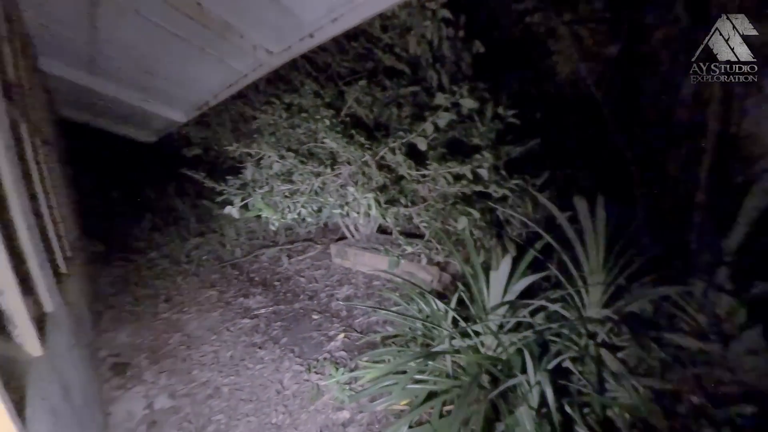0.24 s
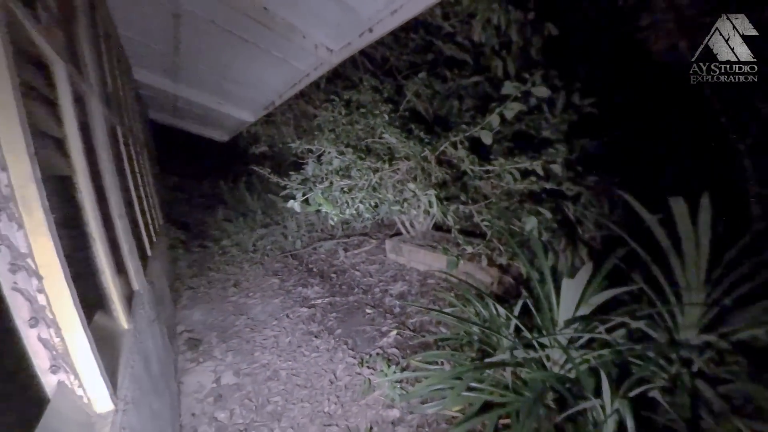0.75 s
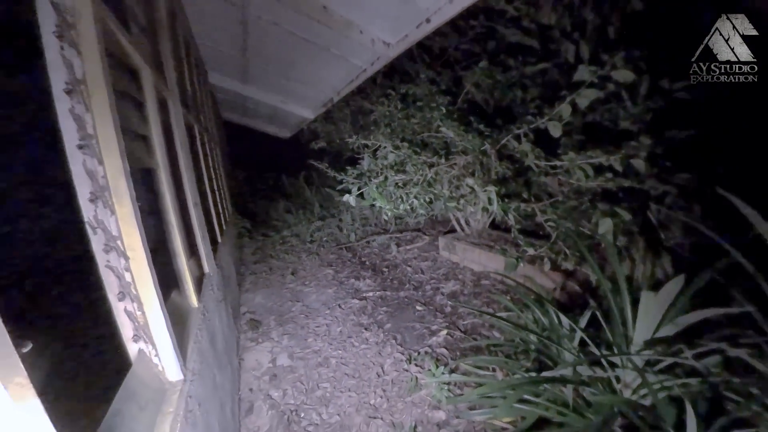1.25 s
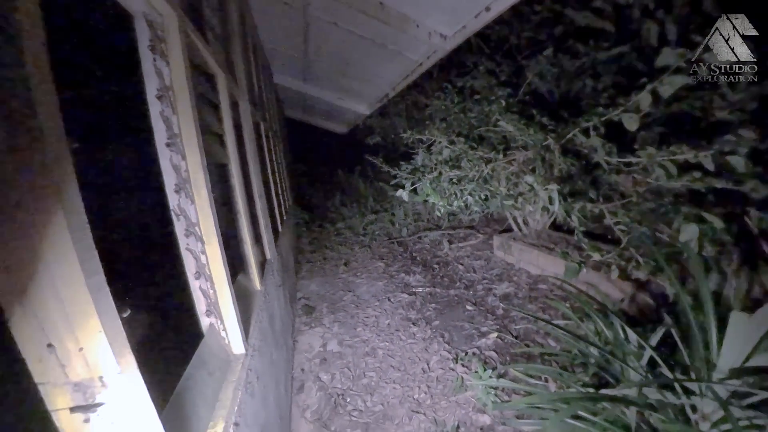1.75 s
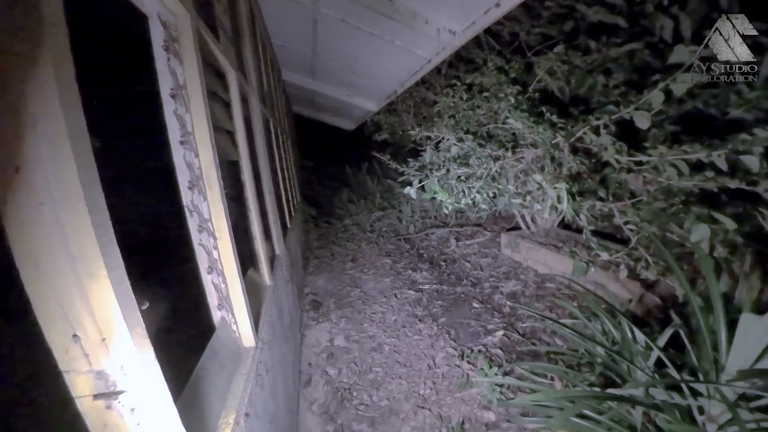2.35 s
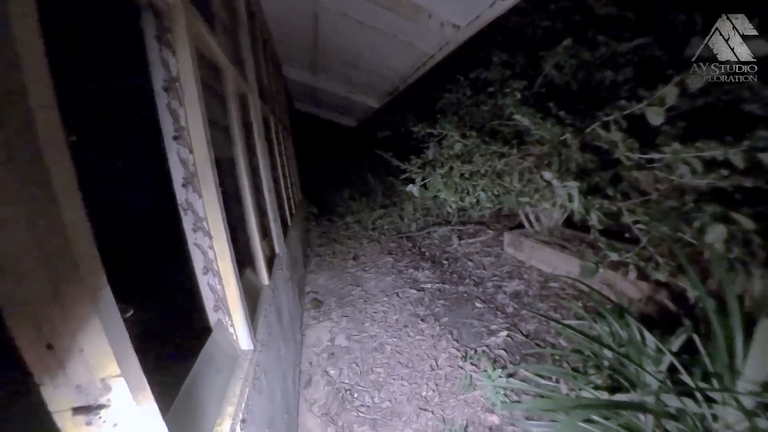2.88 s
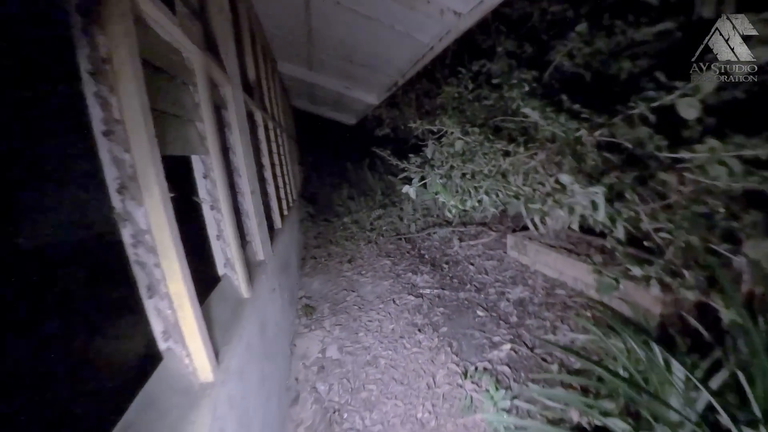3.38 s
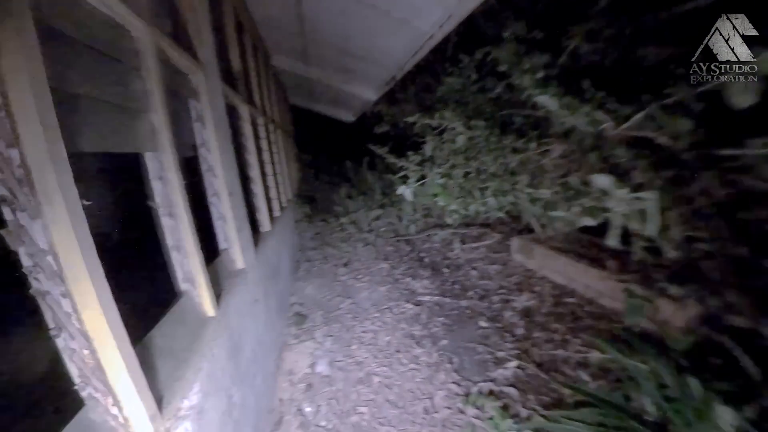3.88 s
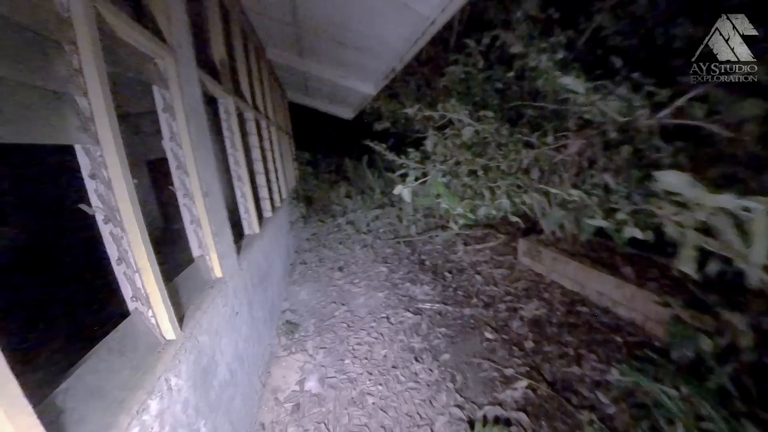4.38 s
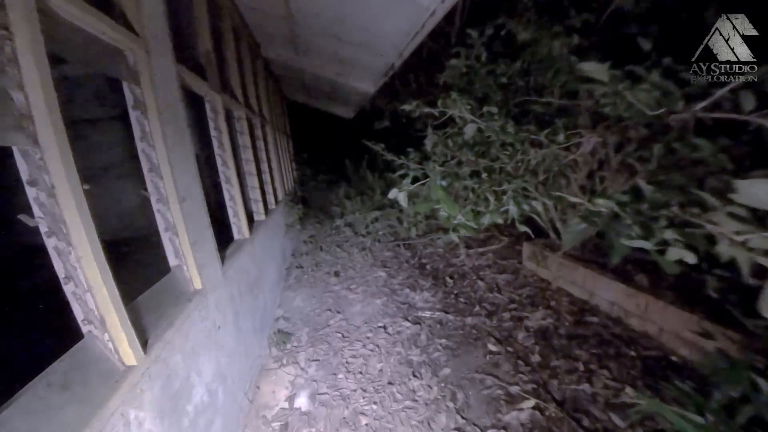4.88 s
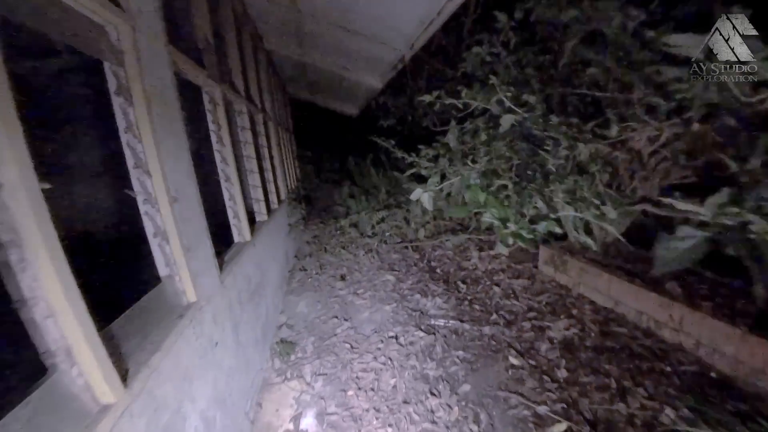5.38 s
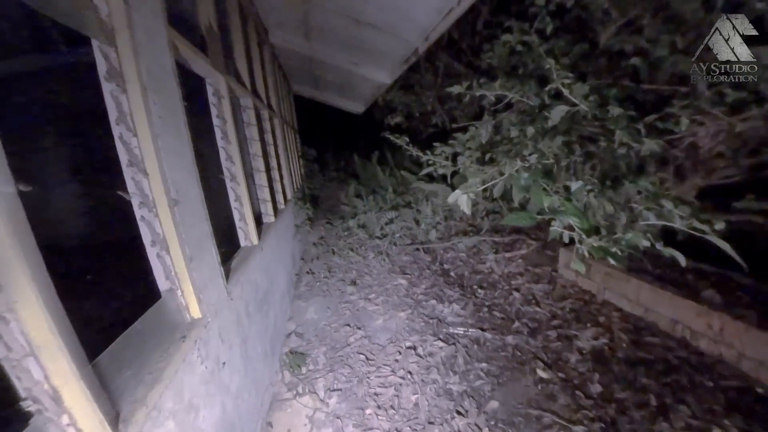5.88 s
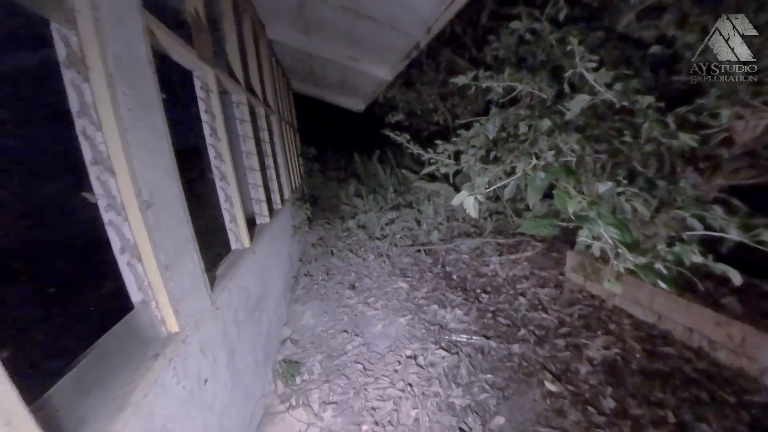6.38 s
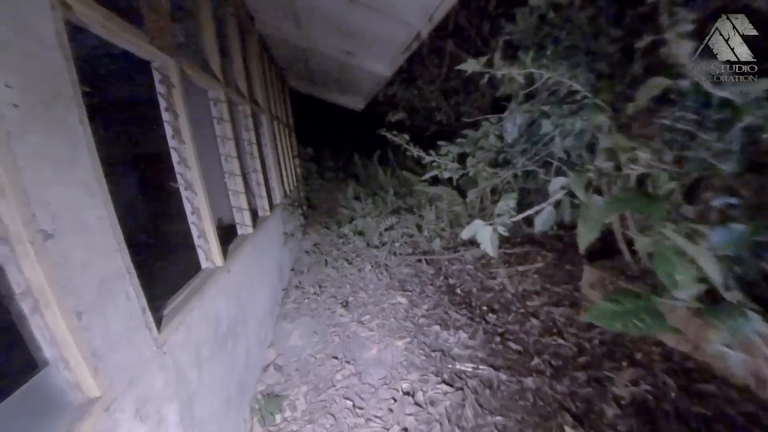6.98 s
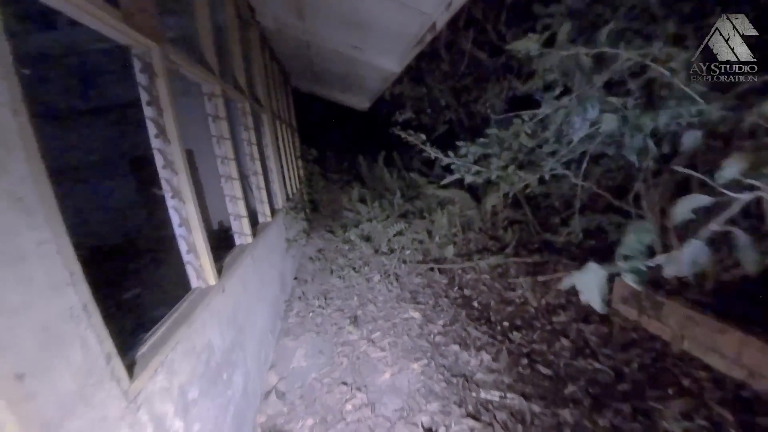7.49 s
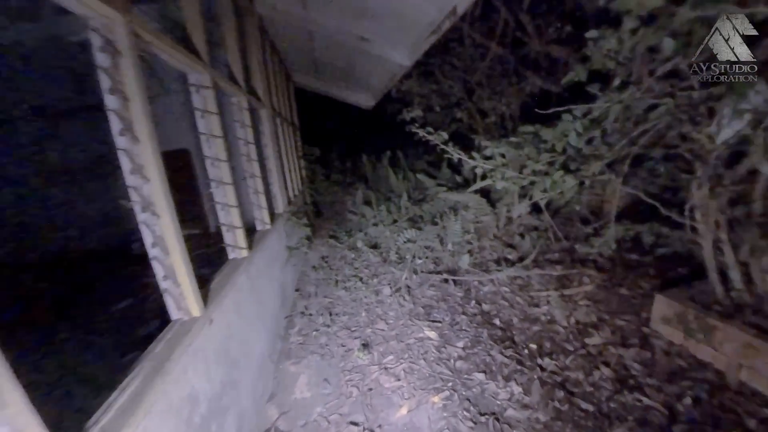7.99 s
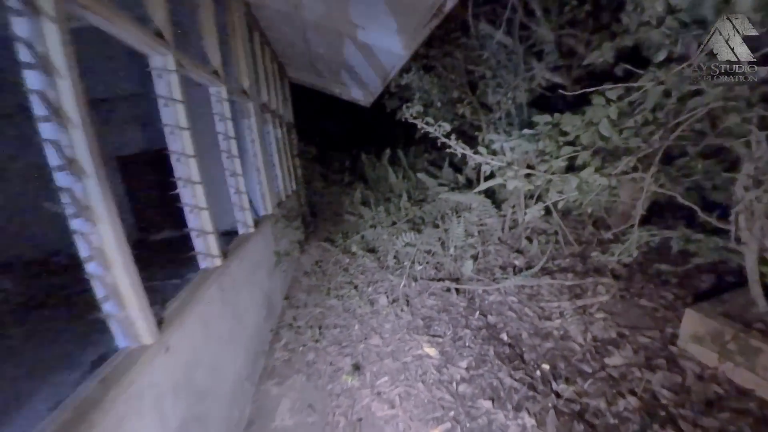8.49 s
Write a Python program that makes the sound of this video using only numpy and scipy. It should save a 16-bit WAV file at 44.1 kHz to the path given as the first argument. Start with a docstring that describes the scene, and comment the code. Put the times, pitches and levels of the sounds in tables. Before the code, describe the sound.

Outdoors at night beside an empty building, someone treads slowly through dry leaves and twigs. The first steps are light, with two crickets chirping nearby over a faint, high insect chorus. Then the steps dig in: twigs snap, leaves crunch, and a sole knocks and scuffs, echoing briefly off the wall. The crickets stop, a big snap lands near the end, and the steps ease. The handheld microphone sounds slightly dull, with low rumble and soft bumps.

```python
"""Night beside an empty building. It opens on an insect chorus, still air and a low rumble, as someone
with a handheld camera treads slowly through dry leaves and twigs. Two crickets chirp nearby and a far
insect trills briefly. From 3.5 s the steps dig in: twigs snap and shed debris, leaves crunch, the sole
knocks and scuffs, heel and hand bump; the wall and the rooms behind its open windows answer. The last
chirp comes at 5.4 s, a big snap lands near 8 s, and the steps ease off under the chorus."""
import sys
import numpy as np
from scipy import signal
from scipy.fft import rfft, irfft, next_fast_len
from scipy.io import wavfile
from scipy.ndimage import uniform_filter1d, map_coordinates

SR = 44100
rng = np.random.default_rng(int(sys.argv[2]) if len(sys.argv) > 2 else 0)


def unload_wav(signal):
    """Save mono or channel-first audio to the path in sys.argv[1] as 16-bit WAV at rate SR, clipped to [-1, 1]."""
    wavfile.write(
        sys.argv[1],
        SR,
        np.round(np.clip(np.atleast_2d(signal).T, -1, 1) * 32767).astype(np.int16),
    )


N = 385654

# Tone of breaking leaves and of breaking twigs: f/Hz, level/dB
LEAF_EQ = [(1200, -40), (2200, -4.5), (3000, -3), (3650, -3), (4200, -3.5), (5200, -2.5), (5800, -6),
           (6400, -4), (9000, -1), (16000, -8)]
TWIG_EQ = [(300, -26), (700, 3.5), (1200, 0.5), (2000, 0), (3500, -4), (8000, -42.5)]
# Snaps, plus two strong slap-backs off the wall (at 1.1575 s and 3.696 s):
# t/s, crack level/dB, twig f/Hz, twig debris level/dB, leaf f/Hz, leaf debris level/dB
SNAPS = [(.065, -23, 880, -30, 5530, -27), (.131, -31, 2130, -37, 3200, -40),
         (.1825, -29.5, 1100, -28, 5130, -39), (.833, -40, 2000, -52, 4000, -45),
         (.992, -36.5, 590, -37.5, 2840, -38), (1.067, -38, 910, -39, 3000, -37),
         (1.1495, -24.5, 990, -32, 2770, -33), (1.1575, -31, 2400, -36, 3820, -32.5),
         (2.185, -61, 870, -41, 4910, -42), (2.289, -46, 710, -37, 4770, -36),
         (2.983, -35, 570, -35.5, 6100, -41), (3.529, -18, 1740, -14.5, 5300, -13),
         (3.5345, -11, 1410, -15, 3600, -10.5), (3.553, -19, 2000, -40, 5940, -15),
         (3.571, -10, 2280, -26, 4740, -13.5), (3.5735, -15, 2800, -27, 7000, -21),
         (3.579, -16, 2230, -32, 3520, -17), (3.598, -6, 2280, -33, 4600, -11),
         (3.625, -15, 2030, -38, 5000, -11), (3.633, -12, 570, -41, 4400, -9),
         (3.643, -19, 2250, -40, 5500, -14.5), (3.688, -14, 696, -43, 4500, -14.5),
         (3.696, -22, 2500, -51, 4770, -25), (3.782, -10, 2050, -40, 4600, -12),
         (3.828, -22.5, 605, -36, 4800, -18), (3.856, -38, 820, -33, 4770, -18),
         (3.9, -36, 1400, -21.5, 2600, -43), (3.9595, -26, 600, -22, 2600, -46),
         (4.044, -29, 960, -21.5, 5700, -21), (4.649, -18, 1800, -44, 3600, -21.5),
         (4.751, -31, 2290, -33, 3900, -19), (4.772, -11, 2100, -18, 5700, -5),
         (4.822, -17, 1530, -20.5, 3840, -15.5), (4.941, -41, 2010, -25, 3170, -26),
         (4.953, -27.5, 664, -24, 5600, -16), (5.064, -28, 1480, -22, 2300, -43),
         (5.0858, 1.5, 1410, -4, 3750, -12.5), (5.271, -12, 1570, -49, 5200, -29),
         (5.477, -21.5, 660, -31.5, 7800, -17), (5.558, -24, 1270, -37, 3950, -21),
         (5.62, -25, 2600, -31, 3650, -19), (5.63, -40, 2260, -24.5, 3900, -15),
         (5.639, -34, 2260, -22, 4500, -7.5), (5.65, -18, 2180, -30, 4950, -2.5),
         (5.677, -15, 2500, -22, 6750, -16), (5.72, -28.5, 1680, -19, 5200, -5.5),
         (5.734, -12, 1060, -13, 2600, -8), (5.766, -22, 1090, -41, 3020, -11.5),
         (5.7897, -4.5, 1440, -13.5, 4640, -5.5), (5.7905, -8.5, 710, -15.5, 2920, -2),
         (5.8395, -13.5, 2520, -29, 3170, -6.5), (5.849, -9, 2300, -37, 5460, -6.5),
         (5.941, -24, 1280, -30, 3840, -36), (5.9612, -11, 2000, -14.5, 4660, -6.5),
         (5.9637, -16, 1500, -21, 6240, -17), (5.9833, -2.5, 990, -13, 4700, -13),
         (6.048, -20, 830, -34, 2700, -20.5), (6.095, -23, 1640, -35, 3900, -34),
         (6.112, -15, 1780, -32.5, 5650, -23.5), (6.431, -26, 980, -23, 2350, -20),
         (6.562, -40, 840, -18, 6000, -43), (6.849, -33, 900, -17.5, 5500, -16.5),
         (6.883, -23, 1410, -35, 4620, -29), (6.928, -24, 840, -29, 2900, -23),
         (6.955, -26, 1310, -20.5, 4000, -21.5), (6.999, -16, 750, -23, 2720, -24),
         (7.035, -25, 2000, -23.5, 5150, -19), (7.092, -18, 1530, -14.5, 4800, -13.5),
         (7.155, -24, 1560, -23, 6070, -33), (7.164, -20, 1510, -21, 4900, -25),
         (7.179, -27, 1500, -33, 4060, -32), (7.218, -21, 1300, -22, 2430, -32),
         (7.281, -33, 1510, -47, 7600, -23), (7.729, -40, 925, -26, 2830, -23),
         (7.944, -23, 2800, -33, 3160, -5.5), (7.9712, 3.5, 2800, -12.5, 4800, 2),
         (8.031, -21, 970, -21, 3000, -11), (8.0475, -12, 1700, -23, 3460, -24),
         (8.061, -16.5, 1520, -23, 3530, -13), (8.105, -21, 1500, -40, 8000, -16),
         (8.149, -17, 1780, -31, 5600, -12)]
def snaps(track_count=4, burst_t60_s=.014, crumble_t60_s=.053, cycles_to_peak=.84):
    """Twig and leaf crack together for a few cycles, then shed debris; snaps take turns across tracks."""
    out, t = np.zeros((track_count, N + SR)), np.arange(SR // 7) / SR
    wood = coloured(unit(breaks(per_s=500, spread_db=2.5)) + .43 * rng.standard_normal(N), TWIG_EQ)
    leaf = coloured(unit(breaks(per_s=2500, spread_db=2.5)) + .61 * rng.standard_normal(N), LEAF_EQ)
    burst = amp(-1.5 - 60 * t / burst_t60_s)
    crumble = amp(-10.5 - 60 * t / crumble_t60_s)
    settle = (burst + crumble) * (1 - np.exp(-t / .0008))
    for k, (s, db, twig_hz, twig_db, leaf_hz, leaf_db) in enumerate(SNAPS):
        fresh = rng.integers(N - len(t)) + np.arange(len(t))
        hit = amp(twig_db) * debris(wood[fresh], twig_hz, q=3.9, settle=settle)
        hit += amp(leaf_db) * debris(leaf[fresh], leaf_hz, q=14, settle=settle)
        twig_share = np.clip(amp(twig_db) / (amp(twig_db) + amp(leaf_db - 6)), .08, .92)
        for hz, share in [(twig_hz, twig_share), (leaf_hz, 1 - twig_share)]:
            crack = hump(t * hz / cycles_to_peak) * np.sin(2 * np.pi * hz * t)
            hit += amp(db) * np.sqrt(2 * share) * crack
        out[k % track_count, round(s * SR):][:len(t)] += hit
    return out[:, :N]


def debris(crumbs, hz, q, settle):
    """Crumbs ring at the pitch of the broken piece and of a neighbour as they settle."""
    neighbour_hz = hz * rng.uniform(.75, 1.35)
    rings = .56 * crumbs + ring(crumbs, hz, q) + .26 * ring(crumbs, neighbour_hz, q)
    return unit(settle * rings) * np.sqrt(np.mean(settle ** 2))


# Leaf accents: t/s, level/dB, f/Hz, attack/s
FLICKS = [(3.535, -21, 5700, 0.0022), (3.541, -24, 3450, 0.0027), (3.552, -20.5, 6050, 0.0023),
          (3.633, -23, 4530, 0.0024), (3.643, -20, 5960, 0.0016), (4.825, -34, 3880, 0.011),
          (4.84, -35.5, 5500, .012), (5.086, -22, 5300, 0.0032), (5.095, -16, 1700, .008),
          (5.1, -17, 5300, 0.0035), (5.633, -26, 2240, 0.0033), (5.638, -21, 3700, 0.0036),
          (5.642, -20, 5900, 0.0032), (5.647, -12.5, 4820, 0.0042), (5.659, -14, 5080, 0.0034),
          (5.6992, -13, 5200, 0.0016), (5.707, -18, 5300, .002), (5.718, -24, 4420, 0.0042),
          (5.72, -28, 5460, .005), (5.765, -21.5, 1110, 0.0031), (5.852, -21, 6600, 0.0042),
          (5.853, -27, 3900, 0.0045), (5.963, -14.5, 4630, 0.0011), (5.99, -25, 4770, 0.0022),
          (5.978, -17, 2620, 0.0019), (6.953, -40, 4000, 0.0035), (6.966, -31.5, 5300, 0.0083),
          (7.004, -30, 5900, 0.0022), (7.033, -32, 5130, 0.0043), (7.095, -35, 6500, .005),
          (7.142, -33, 5900, 0.0043), (7.16, -31, 4800, 0.0077), (7.162, -37, 6150, 0.0058),
          (7.21, -45, 4940, 0.013), (7.288, -40.5, 3950, 0.005), (7.934, -24, 6300, .004),
          (7.939, -9, 6330, 0.0022), (7.943, -10.5, 3500, 0.0016), (7.953, -21, 6200, 0.0026),
          (7.963, -23, 6400, 0.0034), (7.972, -19, 3650, 0.0036), (7.979, -20, 2720, 0.0014),
          (7.991, -10.5, 3770, 0.0018), (7.995, -20, 6160, 0.0049), (8.03, -21.5, 3900, 0.0045),
          (8.054, -20, 1580, 0.0016), (8.648, -35, 3960, 0.0091)]
def leaf_flicks(q=9):
    """A stiff leaf flicks: scraping noise rings around one pitch for a soft-edged moment."""
    out, t = np.zeros(N + SR), np.arange(SR // 10) / SR
    for s, db, hz, attack_s in FLICKS:
        envelope = hump(t / attack_s)
        rasp = unit(envelope * noise_band(len(t), hz, q))
        out[round(s * SR):][:len(t)] += amp(db) * rasp * np.sqrt(np.mean(envelope ** 2))
    return out[:N]


# The sole presses into the litter: t/s, hold/s, soil level/dB, twig level/dB, leaf level/dB
STEPS = [(0.0, 0.15, -45, -47.5, -47), (0.31, 0.1, -46.5, -54, -58), (1.157, 0.2, -57, -48.5, -62),
         (3.02, 0.085, -55, -53, -63), (3.513, 0.093, -47.5, -47, -47.5),
         (3.705, 0.15, -42.5, -46.5, -39.5), (3.882, 0.15, -40, -47.5, -56),
         (4.194, 0.48, -49.5, -55.5, -60), (4.594, 0.22, -61, -47.5, -45.5),
         (4.843, 0.14, -63, -51.5, -36.5), (5.093, 0.13, -46, -36, -39), (5.435, 0.24, -47.5, -44.5, -41.5),
         (5.679, 0.082, -44.5, -39, -26), (5.88, 0.18, -44, -59, -39.5), (6.245, 0.46, -49.5, -51.5, -43),
         (6.586, 0.25, -53, -46.5, -39.5), (6.899, 0.29, -53.5, -45.5, -35.5),
         (7.3, 0.4, -53.5, -58, -51.5), (7.728, 0.17, -47.5, -45.5, -40), (7.958, 0.18, -66, -46.5, -31.5),
         (8.234, 0.3, -49.5, -47, -41.5), (8.638, 0.033, -43.5, -38.5, -33.5)]
# The sole scuffs the soil: t/s, level/dB
SCUFFS = [(.184, -37.5), (.328, -37), (1.15, -39.5), (3.012, -35), (3.539, -29.5), (3.629, -28),
          (3.91, -18.5), (4.16, -36.5), (4.779, -31), (5.09, -33.5), (5.48, -46), (5.73, -26.5),
          (5.79, -42), (5.982, -29.5), (6.86, -42.5), (6.93, -39), (7.11, -37), (7.165, -34), (7.75, -41),
          (7.909, -33.5), (7.98, -30)]
# Dull body of the soil: f/Hz, level/dB
SOIL_EQ = [(80, -21.5), (220, -6.5), (450, -5), (700, -4), (1500, -26.5)]
def footsteps():
    """Leaves and twigs crunch in clumps under each step while the sole presses and scuffs the soil."""
    s, hold_s, *levels = np.transpose(STEPS)
    on_soil, on_twigs, on_leaves = [swells(s, hold_s, db, in_db_s=245, out_db_s=104.5) for db in levels]
    scuff_s, scuff_db = np.transpose(SCUFFS)
    on_soil = np.hypot(on_soil, swells(scuff_s, 0, scuff_db, in_db_s=703, out_db_s=304))
    clump_db = 2 * wobble(35)
    leaves = on_leaves * amp(clump_db + 2.1 * wobble(70))
    leaves *= grit(LEAF_EQ, 2460, 8220, per_s=1300, hiss=1, patchy_db=1.5)
    twigs = on_twigs * amp(clump_db + .36 * wobble(46))
    twigs *= grit(TWIG_EQ, 570, 2080, per_s=400, hiss=.48, patchy_db=4)
    soil = on_soil * amp(3.6 * wobble(25))
    soil *= grit(SOIL_EQ, 201, 540, per_s=150, hiss=.66, patchy_db=6.5)
    return leaves + twigs + soil


def grit(eq, lo_hz, hi_hz, per_s, hiss, patchy_db, sizes=7):
    """Crunch texture: pieces of several sizes break and ring, each size in clumps of its own."""
    crunch = 0
    for hz in np.geomspace(lo_hz, hi_hz, sizes):
        pieces = unit(breaks(per_s / sizes, spread_db=3.5)) + hiss * rng.standard_normal(N)
        crunch += amp(patchy_db * wobble(25)) * (.15 * pieces + ring(pieces, hz, q=4.6))
    return unit(coloured(crunch, eq))


def breaks(per_s, spread_db):
    """Raw crackle: tiny fractures as random clicks of uneven size."""
    size = amp(spread_db * np.minimum(rng.exponential(size=N), 4)) * rng.choice([-1, 1], N)
    return (rng.random(N) < per_s / SR) * size


# Hollow knocks: t/s, level/dB, f/Hz, t60/s
KNOCKS = [(0.326, -35, 247, 0.18), (0.393, -42, 375, 0.13), (1.151, -46.5, 1092, 0.28),
          (2.98, -33.5, 254.5, 0.25), (3.11, -44, 200, 0.086), (3.896, -13, 470, 0.07),
          (3.909, -12, 434, 0.059), (3.919, -16.5, 257, 0.09), (3.928, -20, 500, 0.052),
          (3.959, -14.5, 488, 0.052), (4.129, -37, 310, 0.2), (5.791, -25, 300, 0.056),
          (5.984, -21.5, 550, 0.044), (6.927, -24, 343, 0.071), (6.999, -28, 850, 0.03),
          (7.151, -32.5, 305, 0.12)]
def sole_knocks():
    """The sole strikes something loose, with a quick attack."""
    return thuds(KNOCKS, attack_s=.003)


# Low bumps: t/s, level/dB, f/Hz, t60/s, level/dB of the shake added to the rumble
BUMPS = [(1.651, -38, 66, .1, -41), (3.392, -31, 103.6, 0.17, -33), (4.286, -20, 75.4, 0.12, -32.5),
         (4.474, -20, 70, 0.15, -37), (5.162, -21, 55.3, 0.16, -39), (6.499, -38, 60, .1, -47),
         (6.849, -10.5, 120, 0.072, -39), (7.398, -28, 101.6, 0.39, -30), (7.836, -27, 65, 0.035, -35),
         (7.893, -27, 76.5, 0.11, -20), (8.149, -44, 70, 0.14, -37), (8.319, -30, 70, .1, -27)]
def bumps():
    """Heel and hand bump softly, adding low-end weight."""
    return thuds(BUMPS, attack_s=.0089)


def thuds(hits, attack_s):
    """Soft contact: two partials swell in and die away."""
    out, t = np.zeros(N + SR), np.arange(SR // 2) / SR
    for s, db, hz, t60, *_ in hits:
        partials = np.sin(2 * np.pi * hz * t) + np.sin(2 * np.pi * (.689 * hz * t + rng.random()))
        envelope = amp(db - 60 * t / t60) * (1 - np.exp(-t / attack_s))
        out[round(s * SR):][:len(t)] += envelope * partials
    return out[:N]


# Early reflections off the wall: delay t/s, level/dB
WALL_ECHOES = [(.0078, -5), (.013, -14), (.017, -13), (.025, -15)]
# Decay of the rooms behind the windows: f/Hz, t60/s
ROOM_DECAY = [(200, .8), (1000, .75), (1800, .55), (3000, .28), (6000, .2)]
def building(tracks, wet_db, predelay_s=.008, scatter_t60_s=.01, clean_ratio=1.3):
    """The wall slaps back and the rooms ring on, darkening; each track gets its own reverb tail."""
    hz, t, noise = signal.stft(rng.standard_normal((len(tracks), SR)), SR, nperseg=256)
    tail = signal.istft(noise * amp(-60 * t / along(ROOM_DECAY, hz)[:, None]), SR, nperseg=256)[1]
    tail = amp(wet_db) * tail / np.linalg.norm(tail, axis=1, keepdims=True)
    response = np.pad(tail, ((0, 0), (round(predelay_s * SR), 0)))
    response[:, 0] = 1  # direct sound
    echo_t = np.arange(SR // 50) / SR
    for s, db in WALL_ECHOES:
        # frames and sills scatter each echo behind its clean front
        echo = rng.standard_normal((len(tracks), len(echo_t))) * amp(-60 * echo_t / scatter_t60_s)
        echo[:, 0] = clean_ratio * np.linalg.norm(echo, axis=1)
        echo /= np.linalg.norm(echo, axis=1, keepdims=True)
        response[:, round(s * SR):][:, :len(echo_t)] += amp(db) * echo
    return signal.fftconvolve(tracks, response, axes=1)[:, :N].sum(axis=0)


# Chirps of the lower and the higher cricket: t/s (middle of first stroke), level/dB, strokes, f/Hz
LOW_CHIRPS = [(1.315, -53, 1, 4700), (1.358, -46, 2, 4870), (1.511, -45, 3, 4860), (1.755, -44, 3, 4910),
              (1.998, -43.5, 2, 4870), (2.193, -44, 3, 4860), (2.44, -44.5, 3, 4880),
              (2.68, -44.5, 2, 4900), (2.872, -48, 3, 4840), (3.112, -44, 2, 4860), (3.362, -45, 2, 4800),
              (3.97, -47, 2, 4740), (4.152, -44, 2, 4840), (4.409, -48, 3, 4720), (5.38, -42, 2, 4900)]
HIGH_CHIRPS = [(.203, -51, 1, 5050), (.245, -51, 2, 5300), (.512, -50, 1, 5200), (.56, -53, 2, 5000),
               (.732, -52, 2, 5330), (.95, -52, 2, 5220), (1.213, -52, 2, 5250), (1.555, -50, 1, 5250),
               (3.278, -43, 1, 4950), (3.32, -42, 1, 5100), (3.48, -49, 1, 5100)]
def crickets():
    """Two crickets nearby: one raspy and washed out, the higher one shorter, cleaner and drier."""
    low = cricket(LOW_CHIRPS, half_stroke_s=.009, fall_hz_s=22000, rasp=.7, echo=.75, wash=.8)
    high = cricket(HIGH_CHIRPS, half_stroke_s=.008, fall_hz_s=42000, rasp=.25, echo=.2, wash=.3)
    return low + high


def cricket(chirps, half_stroke_s, fall_hz_s, rasp, echo, wash, beat_s=.0435, smear_t60_s=.41):
    """Each wing stroke is a raspy swell of falling pitch; the wall repeats it, leaves smear it."""
    out, t = np.zeros(N + SR), np.arange(-SR // 20, SR // 20) / SR
    envelope = np.exp(-(t / half_stroke_s) ** 4)
    for s, db, strokes, wing_hz in chirps:
        for k in range(round(strokes)):
            teeth = 1 + rasp * unit(uniform_filter1d(rng.standard_normal(len(t)), size=50))
            tone = np.sin(2 * np.pi * (wing_hz * t - fall_hz_s * t * t / 2 + rng.random()))
            stroke = amp(db + rng.normal(0, 1)) * envelope * teeth * tone
            out[round((s + k * beat_s + t[0]) * SR):][:len(t)] += stroke
    tail_t = np.arange(SR // 5) / SR
    smear = rng.standard_normal(len(tail_t)) * amp(-60 * tail_t / smear_t60_s)
    off_leaves = signal.fftconvolve(out, smear / np.linalg.norm(smear))
    off_wall = np.roll(out, round(.013 * SR))
    return out[:N] + echo * off_wall[:N] + wash * off_leaves[:N]


# One trill: t/s, hold/s, level/dB, f/Hz, rise/Hz
TRILL = (0.6, 1.5, -65, 3300.5, 130)
def insect_trill(rasp_hz=110):
    """A far insect holds a faint, fuzzy note that climbs a little."""
    s, hold_s, db, hz, rise_hz = TRILL
    climb = np.clip((np.arange(N) / SR - s) / hold_s, 0, 1)
    pitch = hz + rise_hz * climb + rasp_hz * wobble(150)
    envelope = swells(s, hold_s, db, in_db_s=150, out_db_s=150) * amp(3.3 * wobble(60.2))
    return envelope * np.sin(2 * np.pi * np.cumsum(pitch) / SR)


# Bands of the chorus: f/Hz, resonance width/Hz, relative level/dB
CHORUS_BANDS = [(5000, 900, -10), (6090, 400, -1.5), (7020, 550, -8), (9100, 440, -6)]
# The lowest singer swells and recedes: t/s, level/dB
LOW_SINGER_FADER = [(.3, -66), (.7, -60), (1.1, -60), (1.3, -66), (2.0, -66), (2.4, -62), (2.9, -63),
                    (3.4, -65)]
def insect_chorus(bed_db=-48.5):
    """Many far insects blur into narrow, shimmering bands of hiss."""
    bed = sum(amp(db + wobble(11) + 1.5 * wobble(45)) * noise_band(N, hz, q=hz / width_hz)
              for hz, width_hz, db in CHORUS_BANDS)
    low_singer = noise_band(N, hz=3300, q=11) * fader(LOW_SINGER_FADER) * amp(2.9 * wobble(20))
    return amp(bed_db) * bed + low_singer


# Tone of the night air: f/Hz, level/dB
AIR_EQ = [(60, -14.5), (200, 5), (450, 1.5), (1000, -10.5), (2300, -16.5), (4000, -16), (6500, -30),
          (9000, -13.5)]
def still_air(db=-48.5):
    """A soft bed of noise that breathes slightly."""
    return amp(db + 1.73 * wobble(5.7)) * unit(coloured(rng.standard_normal(N), AIR_EQ))


# Level ride of the rumble: t/s, level/dB
RUMBLE_FADER = [(0, -41.5), (3.4, -40.5), (3.85, -42), (3.97, -32), (4.15, -34.5), (4.25, -46),
                (4.6, -33.5), (5.1, -40), (5.4, -36), (5.55, -42), (5.7, -35), (6.1, -38.5), (7.7, -38.5),
                (8.74, -40.5)]
# Tone of the rumble: f/Hz, level/dB
RUMBLE_EQ = [(12, -23), (25, -10), (60, 0.5), (110, -6.5), (190, -17.5), (400, -39.5)]
def rumble(shake_s=.022):
    """Deep, wavering noise under everything, shaken up by each bump."""
    s, *_, shake_db = np.transpose(BUMPS)
    shakes = swells(s, shake_s, shake_db, in_db_s=197, out_db_s=207)
    gain = np.hypot(fader(RUMBLE_FADER), shakes) * amp(1.87 * wobble(11))
    return gain * unit(coloured(rng.standard_normal(N), RUMBLE_EQ))


def amp(db):
    """Decibels to gain."""
    return 10 ** (np.asarray(db) / 20)


def unit(x):
    """x at rms 1."""
    return x / np.sqrt(np.mean(x ** 2) + 1e-20)


def along(points, hz):
    """Read (f/Hz, value) points on a log frequency axis."""
    f, value = np.transpose(points)
    return np.interp(np.log(hz + 1), np.log(f + 1), value)


def fader(points):
    """Gain that rides through (t/s, level/dB) points."""
    return amp(np.interp(np.arange(N) / SR, *np.transpose(points)))


def wobble(rate):
    """Smooth random modulation, rate knots a second."""
    return map_coordinates(rng.standard_normal(int(N * rate / SR) + 4), [np.arange(N) * rate / SR])


def hump(u):
    """Soft-edged envelope that peaks at u = 1."""
    return (u * np.exp(1 - u)) ** 2


def swells(start_s, hold_s, level_db, in_db_s, out_db_s):
    """Gain of events that fade in, hold and fade out at steady dB rates; powers add."""
    t = np.arange(0, N / SR + .002, .001)[:, None]
    db = level_db - in_db_s * np.maximum(start_s - t, 0) - out_db_s * np.maximum(t - start_s - hold_s, 0)
    return np.interp(np.arange(N) / SR, t[:, 0], np.sqrt(np.sum(amp(db) ** 2, axis=1)))


def ring(x, hz, q):
    """x through a resonance with a peak gain of 1."""
    return signal.lfilter(*signal.iirpeak(hz, q, SR), x)


def noise_band(n, hz, q):
    """Noise sent twice through one resonance; rms 1."""
    return unit(ring(ring(rng.standard_normal(n), hz, q), hz, q))


def coloured(x, eq):
    """x through a minimum-phase EQ of (f/Hz, level/dB) points."""
    size = 2 * next_fast_len(x.shape[-1] // 2 + 4096)
    cepstrum = irfft(np.log(amp(along(eq, np.fft.rfftfreq(size, 1 / SR)))), size)
    cepstrum[1:size // 2] *= 2
    cepstrum[size // 2 + 1:] = 0
    return irfft(rfft(x, size) * np.exp(rfft(cepstrum)), size)[..., :x.shape[-1]]


def scene():
    """The mix, centred: footwork through the building's reverb, then bumps, insects and night beds."""
    tracks = np.vstack([snaps(), leaf_flicks(), footsteps() + sole_knocks()])
    ground = building(tracks, wet_db=-9)
    mix = ground + bumps() + crickets() + insect_trill() + insect_chorus() + still_air() + rumble()
    return np.tile(mix, (2, 1))


# Dull microphone response: f/Hz, level/dB
MIC_EQ = [(20, -5.5), (6600, -4), (7600, -11), (8800, -25.5), (9600, -45.5), (11000, -51.5), (20000, -69)]
# EQ on the phase-scrambled side signal: f/Hz, level/dB
SIDE_EQ = [(2000, -90), (2900, -45), (3200, -11), (5600, -12), (6400, -24), (9000, -40)]
def record(dry, top_hz=16000, rolloff_hz=600):
    """A dull microphone flattens the loudest snaps; a restless phase widens only the low treble."""
    mid = coloured(dry[0], MIC_EQ)
    mid = mid / (1 + np.abs(mid) ** 16) ** (1 / 16)  # saturates at full scale
    frames = signal.stft(mid, nperseg=256)[2]
    scrambled = frames * np.exp(2j * np.pi * rng.random(frames.shape))
    side = coloured(signal.istft(scrambled, nperseg=256)[1][:N], SIDE_EQ)
    size = next_fast_len(N)
    high_cut = np.clip((top_hz - np.fft.rfftfreq(size, 1 / SR)) / rolloff_hz, 0, 1) ** 2
    return irfft(rfft([mid + side, mid - side], size) * high_cut, size)[:, :N]


dry = scene()
out = record(dry)
unload_wav(out)
```